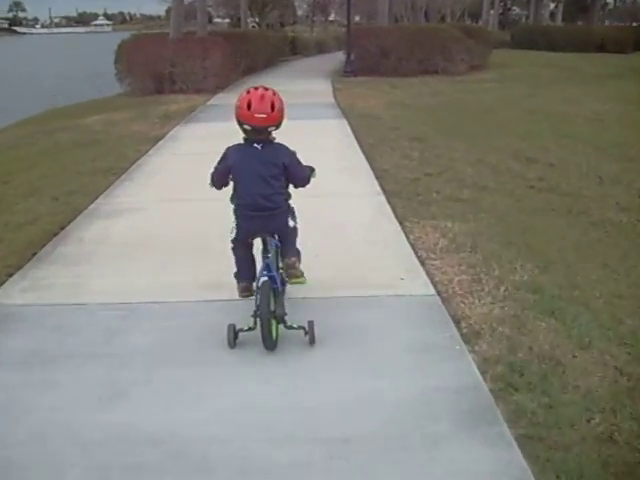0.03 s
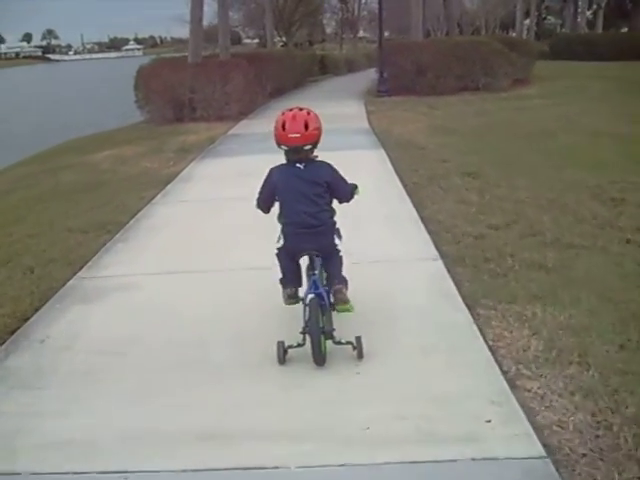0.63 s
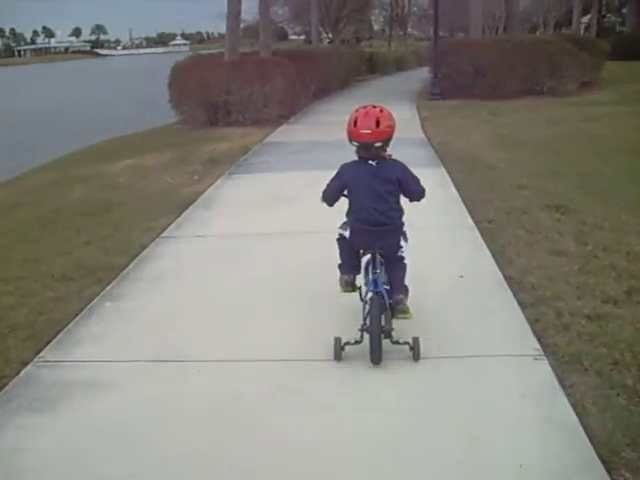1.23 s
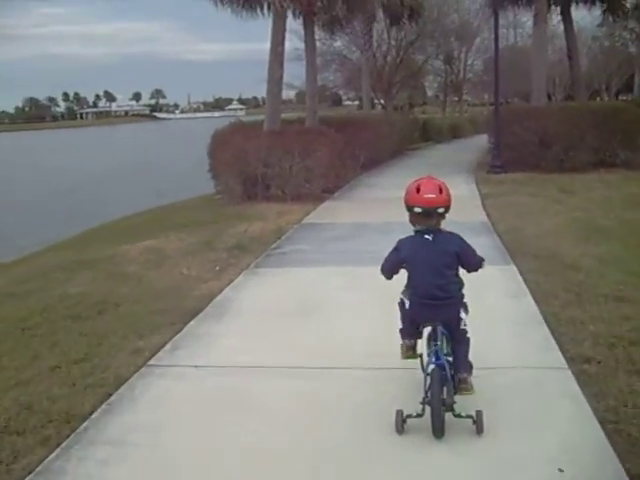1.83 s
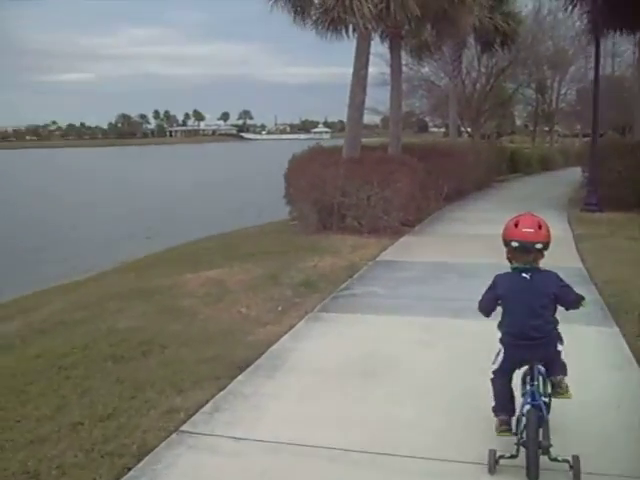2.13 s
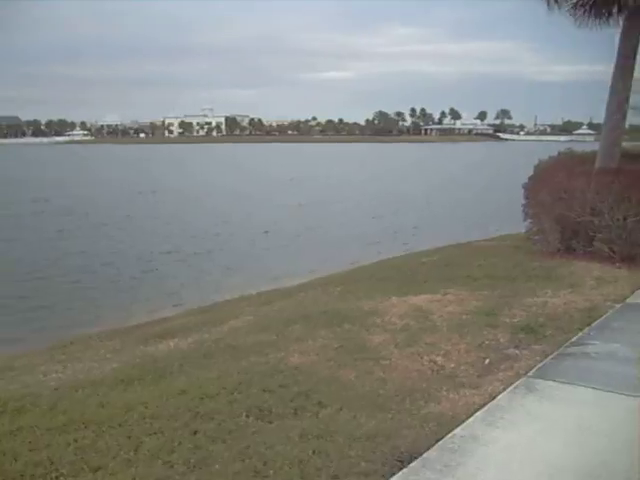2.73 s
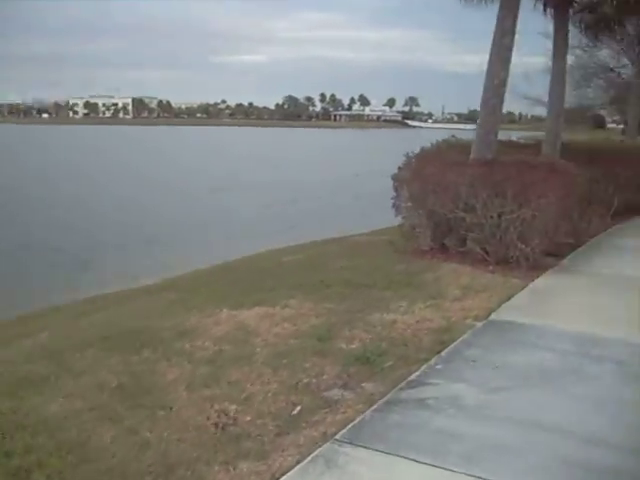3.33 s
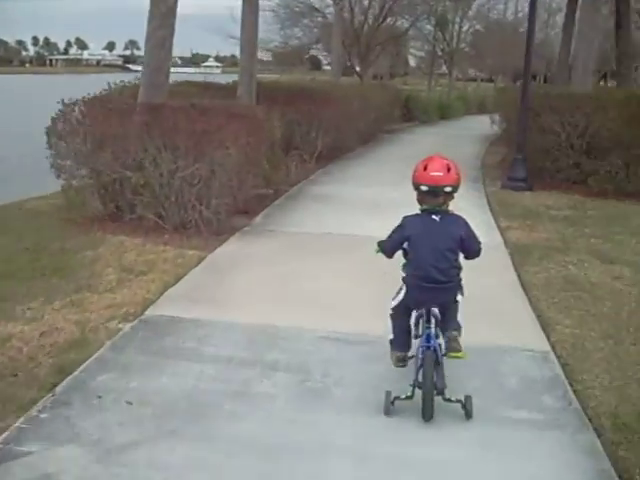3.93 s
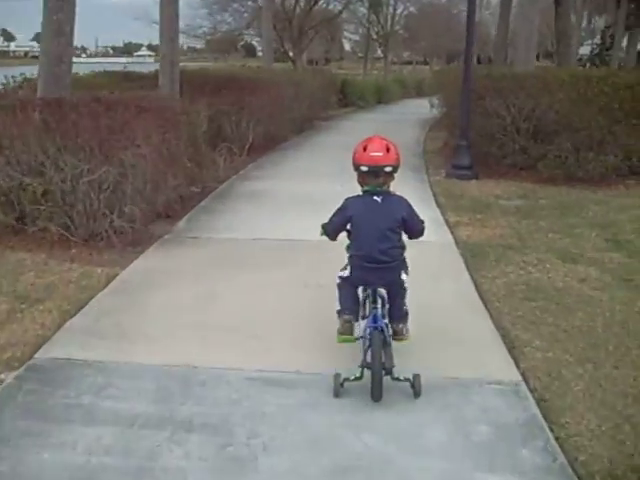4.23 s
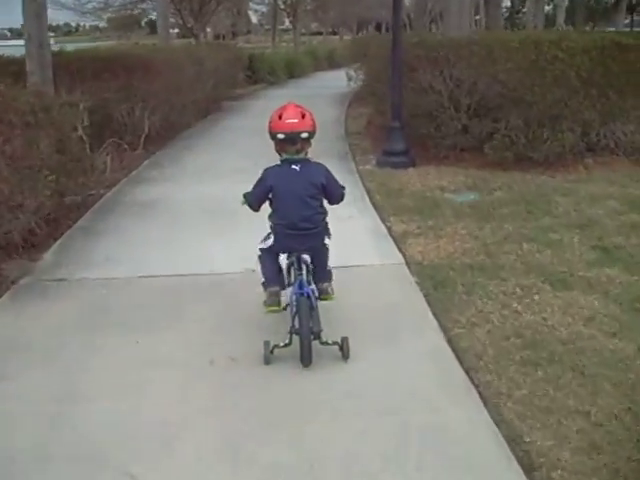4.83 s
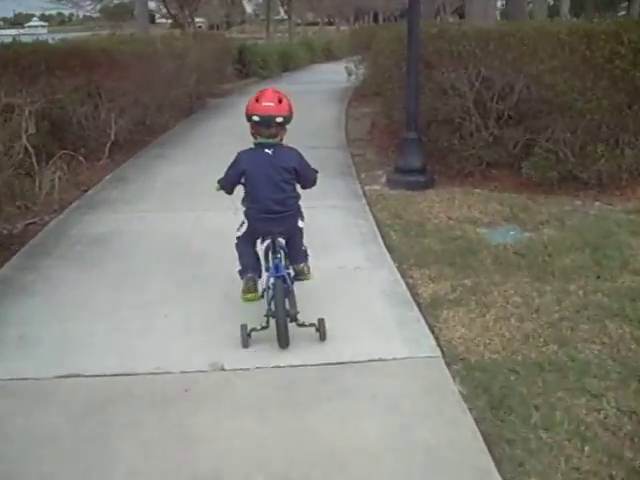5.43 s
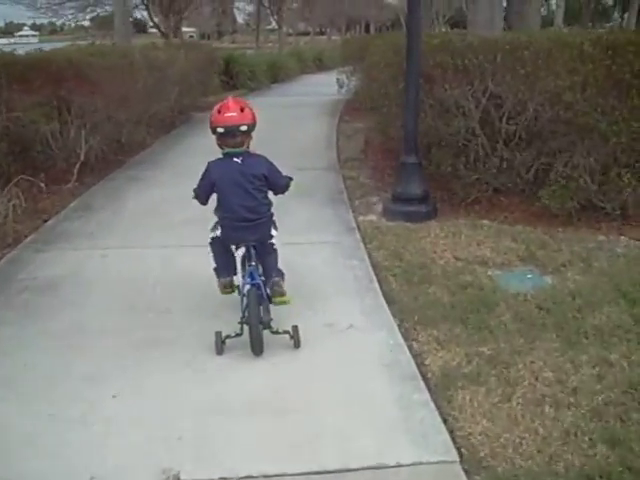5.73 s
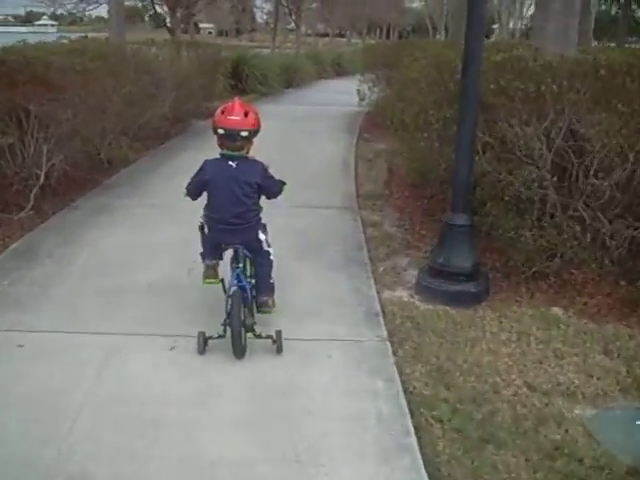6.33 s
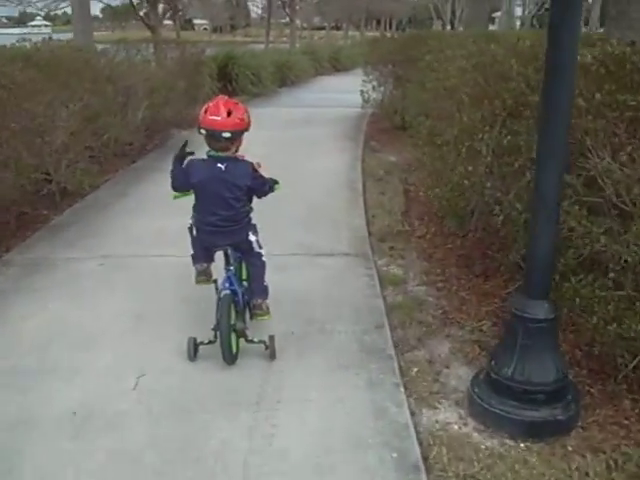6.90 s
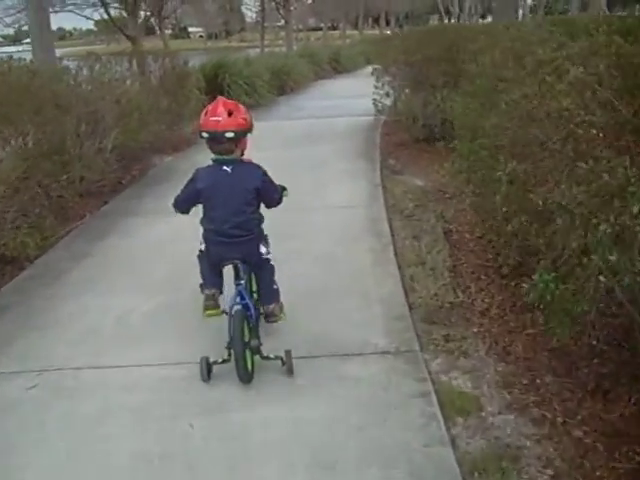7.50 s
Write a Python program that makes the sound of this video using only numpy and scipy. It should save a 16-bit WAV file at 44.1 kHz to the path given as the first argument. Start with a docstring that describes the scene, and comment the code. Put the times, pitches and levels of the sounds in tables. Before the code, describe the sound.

A child's bicycle rolls along concrete, its plastic training wheels rattling and clacking over slab joints, with light wind on the microphone.

```python
"""Training wheels on a concrete path

A child's bicycle rolls along a few steps ahead. Impacts of grit excite the modes of its hard plastic
training wheels, a rattle that swells with each pedal stroke over the rush of the tyres. The wheels
clack over the joints between slabs and tick on their loose axles. Light wind puffs at the microphone
over a quiet lakeside."""
import sys
import numpy as np
from scipy import signal
from scipy.fft import rfft, irfft, next_fast_len
from scipy.io import wavfile

SR = 44100
rng = np.random.default_rng(int(sys.argv[2]) if len(sys.argv) > 2 else 0)


def persist_wave(psi):
    """Save psi, clipped to +-1, as 16-bit WAV."""
    counts = np.round(np.clip(psi, -1, 1) * 32767).astype(np.int16)
    wavfile.write(sys.argv[1], SR, np.atleast_2d(counts).T)


N = 337806
TIME = np.arange(N) / SR

# Roughness of the slabs. Each row: time in seconds, relative levels of rattle and of tyre noise in dB.
SLAB_ROUGHNESS = [(0, -41, -56.5), (0.1, -49.5, -60), (0.3, -44, -58), (0.52, -46, -58.5),
                  (0.9, -49.5, -62.5), (1.35, -50, -60), (1.7, -51.5, -62.5), (2.4, -52.5, -60.5),
                  (2.9, -50, -60.5), (3.19, -53.5, -63.5), (3.32, -45.0, -59), (4.25, -45.5, -54.5),
                  (4.72, -45.5, -58.0), (5.0, -51, -63), (5.35, -43.5, -56.5), (5.7, -49.5, -59),
                  (6.5, -45.0, -60.5), (7.2, -48, -61.0), (7.66, -42.5, -56)]


def rolling():
    """Roughness excitation: wheels rattle and tyres rush in clumps; pedalling modulates the rattle."""
    # Spectrum of rubber on concrete. Each row: frequency in Hz, relative density in dB.
    tyre_spectrum = [(150, -17), (350, -6.5), (620, -12), (820, -1), (980, -4), (1220, 0.5), (1450, -0.5),
                     (2050, -3.5), (2500, 1), (3300, 2.5), (4300, -10), (6000, -25), (10000, -46)]
    slab_db, tyre_db = follow(SLAB_ROUGHNESS)
    strokes_per_s, first_stroke_s = 1.96, 0.29
    strokes = strokes_per_s * (TIME - first_stroke_s)
    lean = np.cos(2 * np.pi * strokes)  # each stroke rocks the bicycle onto a training wheel
    strong_leg = np.cos(np.pi * strokes)  # one leg pushes harder
    skips = wander(rate_hz=30)
    grit = rattle(grains_per_s=480, spread_db=3.0, damping=0.69, weight_db=5.5, bracket_db=-17.5)
    wheels = grit * amp(2.44 * skips)
    rattle_db = slab_db - 3.5 + 1.14 * lean + 0.04 * strong_leg
    rush_db = tyre_db + 2.5 + 2.0 * skips + 0.04 * strong_leg
    return wheels * amp(rattle_db) + bracket(wheels, strong_leg) + noise(tyre_spectrum) * amp(rush_db)


def rattle(grains_per_s, spread_db, damping, weight_db, bracket_db, spots=24):
    """Superposition of random impacts: grit strikes mostly lightly, and each rim spot rings differently."""
    out = np.zeros(N)
    when, spot, force, sign = rng.random((int(grains_per_s * N / SR), 4)).T
    force_db = spread_db * np.minimum(-np.log(1 - force), 3)
    strength = amp(force_db) * np.sign(sign - .5)
    for k, offset in enumerate(np.linspace(-1, 1, spots)):
        ring = wheel_ring(1 + .028 * offset, damping, weight_db, 2000, bracket_db, uneven_db=6)
        on_spot = (spot * spots).astype(int) == k
        impacts = np.bincount((when * N).astype(int), strength * on_spot, N)
        out += signal.oaconvolve(impacts, contact(ring, roughness=1.2))[:N]
    return evened(out)


def wheel_ring(tuning, damping, weight_db, bracket_hz, bracket_db, uneven_db=0, size=4096):
    """Modal impulse response of a wheel on its steel bracket; weight_db lifts the range below 2.2 kHz."""
    # Broad response of the mounted wheel. Each row: frequency in Hz, gain in dB.
    body_response = [(100, -57), (300, -37), (500, -28), (1000, -26), (2100, -19), (2900, -9.5),
                     (3550, -10.5), (3900, -17.5), (4200, -25), (5000, -29.5), (5700, -34.5), (8000, -41),
                     (10500, -45)]
    # Resonances of the wheel. Each row: frequency in Hz, width in Hz, boost in dB, all nominal.
    wheel_modes = [(519, 77, 2.1), (804, 35, 4.7), (1181, 62, 8.3), (1680, 290, 1), (2238, 45, 6.1),
                   (2550, 39, 6.2), (3097, 140, 5), (3301, 177, 16.5), (3973, 56, 9.1), (4660, 200, 3.2),
                   (6370, 270, 2.4)]
    hz = abs(np.fft.fftfreq(size, 1 / SR))
    body_db = read(body_response, hz) + weight_db / (1 + (hz / 2200) ** 6)
    struck_db = uneven_db * rng.uniform(-0.4, 1, len(wheel_modes))  # the contact point favours some modes
    modes = sum(resonance(hz, centre * tuning, width * damping, boost + extra)
                for (centre, width, boost), extra in zip(wheel_modes, struck_db))
    modes += resonance(hz, bracket_hz, 110 * damping, bracket_db + 8)
    # A freer wheel rings longer and its modes stand out more.
    log_gain = np.log(amp(body_db)) + np.log(1 + modes / damping ** 2) / 2
    minimum_phase = np.exp(signal.hilbert(log_gain).conj())  # causal: sudden start, then ringing
    return np.fft.ifft(minimum_phase).real[:size // 2]


def resonance(hz, centre, width, boost_db):
    """Lorentzian resonance: the power that one damped mode adds around its centre."""
    return amp(boost_db) ** 2 / (1 + (2 * (hz - centre) / width) ** 2)


def contact(ring, roughness, rise_s=.0005, size=256):
    """Multipoint contact: rough concrete meets the rim at many instants, colouring each blow anew."""
    u = np.arange(size) / SR / rise_s
    points = rng.standard_normal(size) * u * np.exp(-u)
    points *= roughness / np.linalg.norm(points)
    points[round(rise_s * SR)] += 1
    sound = signal.fftconvolve(ring, points)[:len(ring)]
    return sound * np.linalg.norm(ring) / np.linalg.norm(sound)


def bracket(wheels, strong_leg, centre_hz=1813):
    """Sympathetic resonance: a loose steel bracket sings with the rattle, most on the stronger stroke."""
    # Singing of the bracket. Each row: time in seconds, mean level in dB.
    bracket_levels = [(0, -59.5), (.6, -74.5), (1.4, -67.5), (2.1, -70), (2.9, -80), (3.7, -58), (4.5, -75),
                      (7.2, -74), (7.66, -62)]
    ringing = signal.lfilter(*signal.iirpeak(centre_hz, Q=7, fs=SR), wheels)
    ringing = signal.lfilter(*signal.iirpeak(centre_hz, Q=14, fs=SR), ringing)
    level_db = follow(bracket_levels)[0] + 4.5 * strong_leg + 4 * wander(rate_hz=13)
    return evened(ringing) * amp(level_db)


def clacks():
    """Impact excitation: the wheels drop into joints and slap back on the concrete."""
    # Blows at joints and bumps. Each row: start in seconds, nominal peak in dB, factor on the mode widths,
    # low-frequency weight in dB, bracket frequency in Hz, its relative boost in dB, chatter in dB,
    # chatter decay in seconds.
    joint_blows = [ (0.3156, -15, 0.91, -1.5, 1804, 10, -4, .007),
                   (1.8571, -26.5, 0.6, 3.5, 1800, -3, 0, 0.0099),
                   (2.2054, -32, 1.3, -5, 1700, -3, -6, .003),
                   (2.2079, -16.5, 0.93, 5, 1760, 4, -1, 0.0062),
                   (2.215, -27, 1.2, 10, 1870, 12, 1.5, 0.017),
                   (3.2969, -16.5, 1, -6.5, 1700, 16, -0.5, 0.0049),
                   (3.306, -34, .55, -1, 1800, 23, -6, 0.0087), (3.381, -24, 1.0, 2, 1800, -1, 5, 0.0086),
                   (3.4527, -25.5, 0.71, -3, 1800, -6, -12, .004),
                   (4.3619, -11, 0.73, -6.5, 1200, -2, -9.5, .004),
                   (4.3652, -14.5, 0.84, -4, 1200, -4, -6, 0.0056),
                   (5.3836, -17.5, 1.0, -3, 1500, 1, -3, .008),
                   (6.4423, -13.5, 1.0, -3.5, 1680, 9.5, -0.5, 0.0028),
                   (6.4519, -24, 0.91, -1, 1650, 10, 4.5, 0.014),
                   (6.6549, -33, 0.89, 4.5, 1800, 3, 9, .025), (7.371, -24, 1.4, 9.5, 1600, -1, 6, 0.015),
                   (7.3793, -24, 2.3, 5.5, 1600, 7, 2.5, 0.015),
                   (7.5110, -24.5, 0.89, -11, 1800, -6, 0, 0.027),
                   (7.5535, -16, 1.8, -14, 1880, 21.5, -1.5, 0.0011),
                   (7.6119, -21, 0.73, 5.5, 1800, 0, -2, 0.0078), ]
    out = np.zeros(N)
    for start_s, peak_db, damping, weight_db, bracket_hz, bracket_db, chatter_db, decay_s in joint_blows:
        ring = wheel_ring(0.99, damping, weight_db, bracket_hz, bracket_db)
        add(out, start_s, blow(peak_db, ring, roughness=.3, chatter_db=chatter_db, decay_s=decay_s))
    return out


def blow(peak_db, ring, roughness, chatter_db, decay_s, rebounds_per_s=2200, dull_hz=6500, size=4096):
    """Compliant impact: the plastic gives and dulls the first contact; crisper rebounds then die away."""
    t = np.arange(size) / SR
    rebounds = rng.standard_normal(size) * (rng.random(size) < rebounds_per_s / SR)
    rebounds *= (t > .0015) * np.exp(-t / max(decay_s, 1e-3))  # the wheel is briefly airborne first
    chatter = signal.fftconvolve(rebounds, ring)[:size]
    chatter *= np.linalg.norm(ring) / (np.linalg.norm(chatter) + 1e-12)
    first = np.pad(contact(ring, roughness), (0, size - len(ring)))
    dulled = signal.lfilter(*signal.butter(2, dull_hz, fs=SR), first)
    return amp(peak_db) * (dulled + amp(chatter_db) * chatter) / abs(ring).max()


def ticks():
    """Mechanical play: the loose wheels knock lightly against their axles."""
    # The clearest knocks. Each row: start in seconds, nominal peak in dB, chatter in dB.
    axle_knocks = [(.0231, -29, -14), (.183, -34, 4), (.2023, -28.5, 5), (.23, -31.5, 4.5),
                   (.2813, -32, -6), (.3707, -38, 9), (.3985, -31, 0), (.4653, -31.5, -10), (.7926, -40, 8),
                   (.8234, -32.5, 2.5), (.8485, -28, 0.5), (.912, -32, 0), (.9274, -34, 0),
                   (1.1045, -33, -9), (1.3748, -35.5, 5), (1.3996, -35, 3), (1.9692, -34.5, 3),
                   (2.151, -36, 5), (2.4187, -36, 4.5), (2.4543, -38, -13), (2.7092, -38.5, 2),
                   (2.7319, -30, -16), (2.8799, -33.5, -8), (3.2498, -34.5, 8.5), (3.2738, -35, 3),
                   (3.358, -32, 4), (3.6691, -35, 8.5), (3.7529, -35, 4), (3.829, -27, -4),
                   (3.9929, -32.5, 5), (4.0627, -32.5, 3), (4.2373, -30.5, 1), (4.2482, -31.5, 3),
                   (4.3251, -30.5, 6), (4.3537, -25, -6), (5.2347, -32, -5), (5.9319, -34.5, 2),
                   (6.2492, -33.5, 0), (6.3925, -29, -9), (6.8663, -32.5, -3), (6.9945, -27.5, -7),
                   (7.1809, -34, 6)]
    out = np.zeros(N)
    for start_s, peak_db, chatter_db in list(axle_knocks) + stray_knocks():
        tuning = rng.uniform(.96, 1.03)
        ring = wheel_ring(tuning, damping=1.2, weight_db=4.5, bracket_hz=1850, bracket_db=-5.5, uneven_db=9)
        add(out, start_s, blow(peak_db, ring, roughness=0.4, chatter_db=chatter_db, decay_s=0.0099))
    return out


def stray_knocks(per_s=7, over_slab_db=6.5, spread_db=2):
    """A random point process: further rows of faint axle knocks, harder on rougher slabs."""
    knock_db = follow(SLAB_ROUGHNESS)[0] + over_slab_db
    draws = rng.random((int(per_s * N / SR), 3))
    return [(when * N / SR, knock_db[int(when * N)] + spread_db * (2 * force - 1), 6 * (2 * loose - 1))
            for when, force, loose in draws]


def wind():
    """Turbulent pressure at the microphone: a lumpy low rumble with fluttering buffets."""
    # Strength of the breeze. Each row: time in seconds, relative level in dB.
    breeze_levels = [(0.0, -66.5), (1.0, -64.5), (1.21, -65.5), (1.85, -68.5), (2.09, -67.5), (4.5, -67.5),
                     (5.08, -63.5), (5.97, -64.5), (6.25, -67.5), (6.47, -55.5), (6.89, -66.5), (7.66, -67)]
    # Spectrum of the rumble. Each row: frequency in Hz, relative density in dB.
    wind_spectrum = [(15, -12.5), (40, 1), (80, 4), (130, 0), (200, -5.5), (320, -14.5), (600, -23.5),
                     (1500, -43.5)]
    rumble = noise(wind_spectrum) * amp(follow(breeze_levels)[0] + 0.5 + 1.9 * wander(rate_hz=14))
    return rumble + buffets() * amp(2.5 * wander(rate_hz=45))


def buffets(low_hz=45, edge_hz=195, edge_at_db=-50.5, db_per_octave=16):
    """Passing eddies: bursts of low noise whose bandwidth grows the harder they hit."""
    # Single puffs of air. Each row: start in seconds, nominal level at the crest in dB, length in seconds.
    puffs = [(0.831, -56.5, 0.11), (1.02, -57, 0.074), (1.769, -58.5, 0.11), (2.691, -60.5, 0.039),
             (3.3, -59.5, 0.13), (3.96, -55.5, 0.04), (4.656, -52.5, 0.025), (4.891, -57, 0.12),
             (5.641, -51, 0.034), (6.243, -40.5, 0.013), (6.272, -47.5, 0.033), (6.46, -45, 0.037),
             (6.56, -48.5, 0.021), (6.638, -52.5, .026), (6.763, -40.5, 0.0066), (6.964, -49.5, 0.048),
             (7.129, -52, 0.025), (7.535, -53.5, 0.022)]
    out = np.zeros(N)
    for start_s, crest_db, length_s in puffs:
        u = np.arange(SR // 2) / SR / (length_s / 2)
        top_hz = edge_hz * 2 ** ((crest_db - edge_at_db) / db_per_octave)
        band = signal.butter(2, [low_hz, max(top_hz, 2 * low_hz)], "bandpass", fs=SR, output="sos")
        eddy = signal.sosfilt(band, rng.standard_normal(SR))[-len(u):]
        swell = (u * np.exp(1 - u)) ** 1.3
        add(out, start_s - .004, amp(crest_db) * evened(eddy * swell) * np.sqrt(np.mean(swell ** 2)))
    return out


def chirps():
    """Linear frequency sweeps: thin, rising tones barely above the hiss."""
    # Faint glides. Each row: start and length in seconds, first and last frequency in Hz, level in dB.
    glides = [(1.9, .035, 7100, 8100, -78), (3.728, .038, 7160, 8500, -76)]
    out = np.zeros(N)
    for start_s, length_s, from_hz, to_hz, level_db in glides:
        hz = np.linspace(from_hz, to_hz, int(length_s * SR))
        tone = np.sin(2 * np.pi * np.cumsum(hz) / SR)
        add(out, start_s, amp(level_db) * tone * signal.windows.tukey(len(hz), .5))
    return out


def background(whine_hz=7988):
    """The noise floor: open air, the microphone's hiss and a thin electronic whine."""
    # Spectra of the open air and of the hiss. Each row: frequency in Hz, relative density in dB.
    air_spectrum = [(20, 7.5), (100, 8.5), (300, -3.5), (700, 8), (1500, -5.5), (3200, 2.5), (5000, -29.5),
                    (8000, -46)]
    hiss_spectrum = [(20, 0), (10200, 0), (11000, -8), (11600, -16)]
    electronics = amp(-81) * noise(hiss_spectrum) + amp(-91) * np.sin(2 * np.pi * whine_hz * TIME)
    return amp(-67.5) * noise(air_spectrum) + electronics


def noise(spectrum):
    """Spectral shaping: white noise takes the given spectrum, at rms 1."""
    size = next_fast_len(N, True)
    gain = amp(read(spectrum, np.fft.rfftfreq(size, 1 / SR)))
    return evened(irfft(rfft(rng.standard_normal(size)) * gain, size)[:N])


def wander(rate_hz, size=4096):
    """Low-pass noise: a random wobble of rms 1 that rolls off above the rate."""
    span_s = N / SR
    hz = np.fft.rfftfreq(size, span_s / size)
    slow = irfft(rfft(rng.standard_normal(size)) / (1 + (hz / rate_hz) ** 4))
    return evened(np.interp(TIME, np.linspace(0, span_s, size), slow))


def amp(db):
    """Decibels as an amplitude ratio."""
    return 10 ** (np.asarray(db) / 20)


def evened(x):
    """Normalisation to rms 1."""
    return x / np.sqrt(np.mean(x ** 2) + 1e-20)


def read(points, hz):
    """Interpolation of a spectrum on a log-frequency axis."""
    point_hz, db = np.transpose(points)
    return np.interp(np.log(hz + 1), np.log(point_hz + 1), db)


def follow(rows):
    """Linear interpolation of each level column at every sample."""
    times_s, *columns = np.transpose(rows)
    return [np.interp(TIME, times_s, column) for column in columns]


def add(mix, start_s, sound):
    """Superposition of a sound on the mix from a given time."""
    part = mix[max(round(start_s * SR), 0):][:len(sound)]
    part += sound[:len(part)]


def scene():
    """Linear superposition: all sources sum in one channel."""
    return (rolling() + clacks() + ticks() + wind() + chirps() + background())[None]


def record(dry):
    """Band limiting: a linear-phase low-pass filter removes the highest treble."""
    low_pass = signal.firwin(255, cutoff=11500, window=("kaiser", 8), fs=SR)
    return signal.oaconvolve(dry, low_pass[None], "same")


dry = scene()
out = record(dry)
persist_wave(out)
```